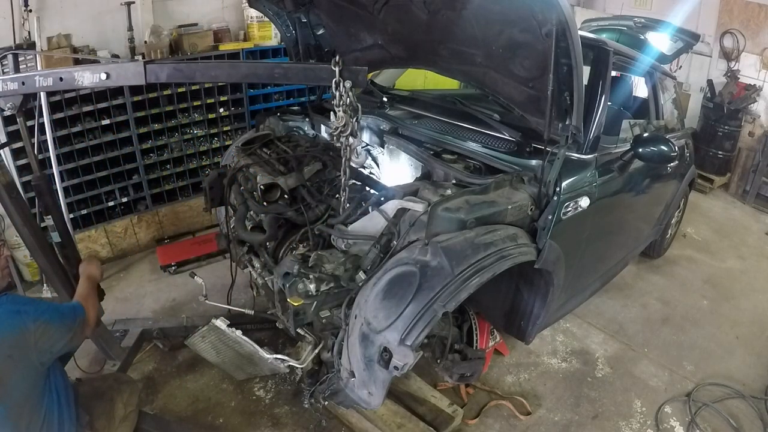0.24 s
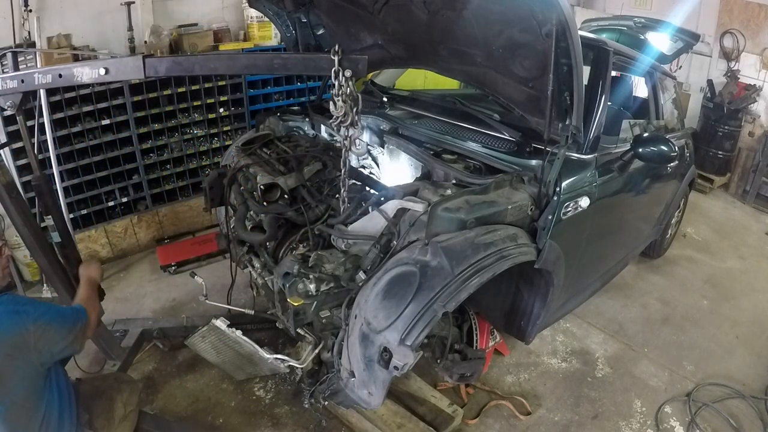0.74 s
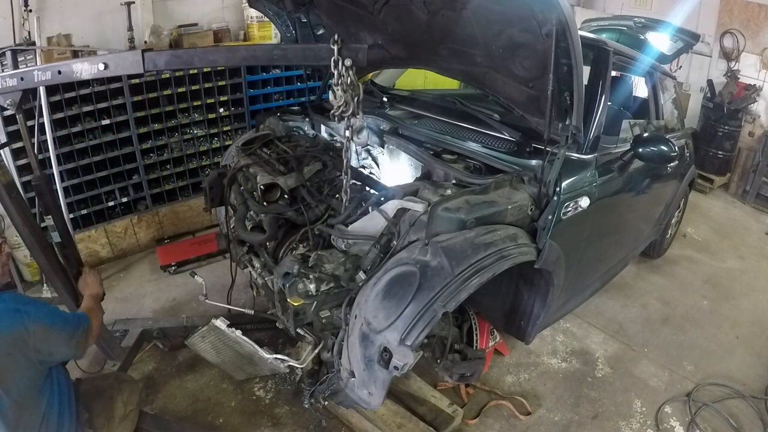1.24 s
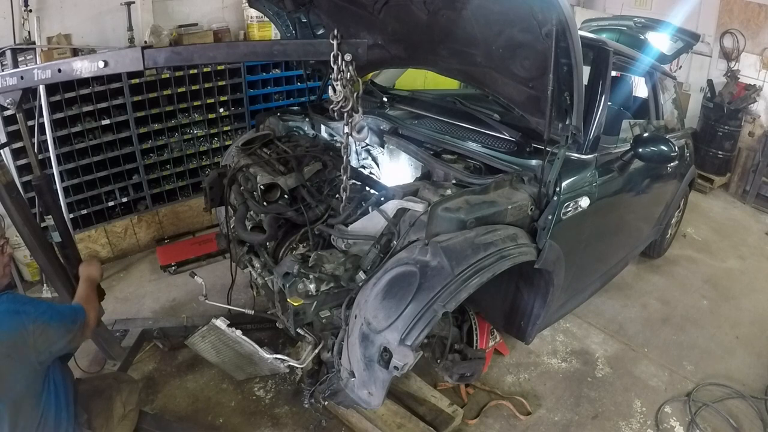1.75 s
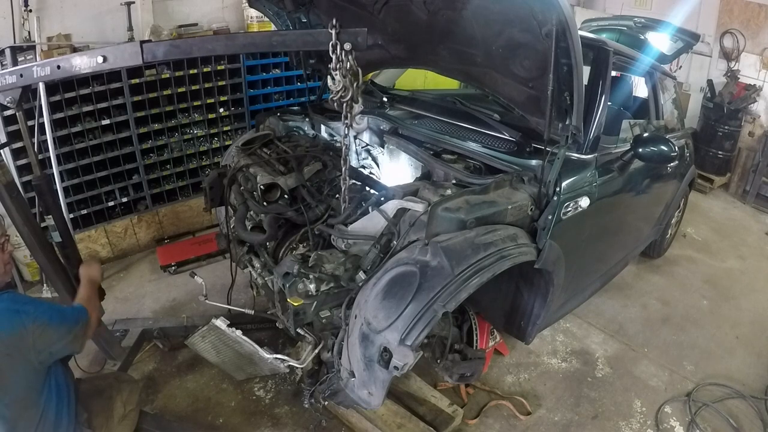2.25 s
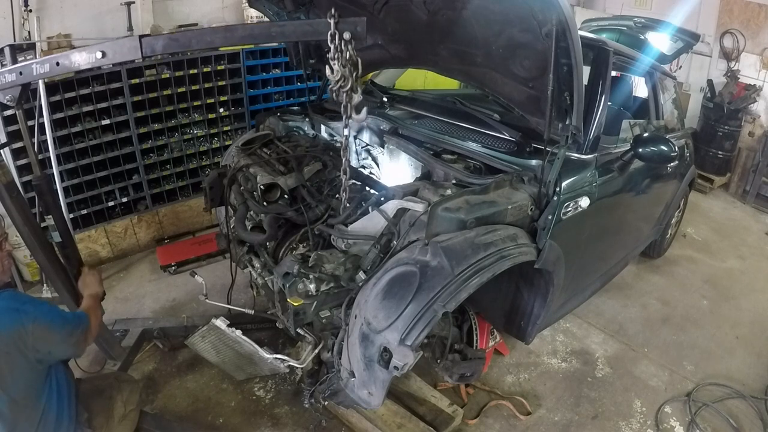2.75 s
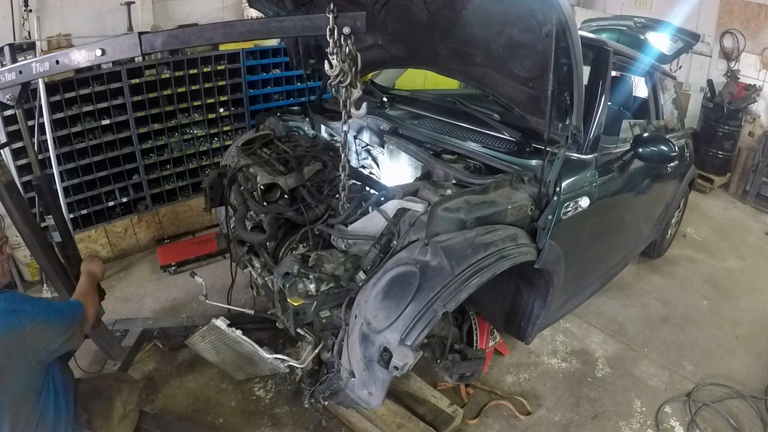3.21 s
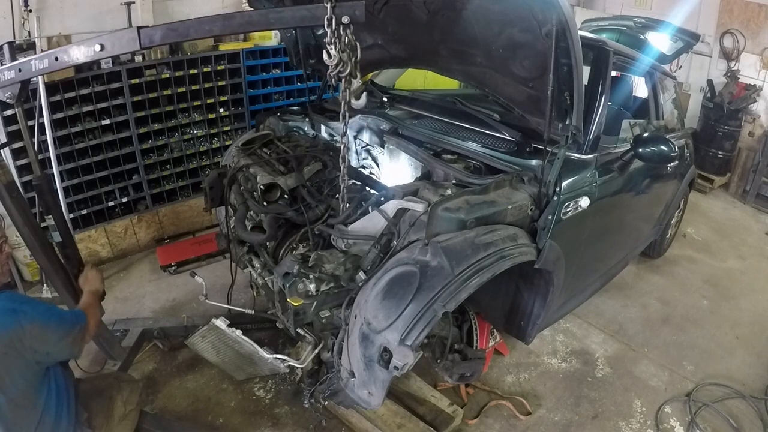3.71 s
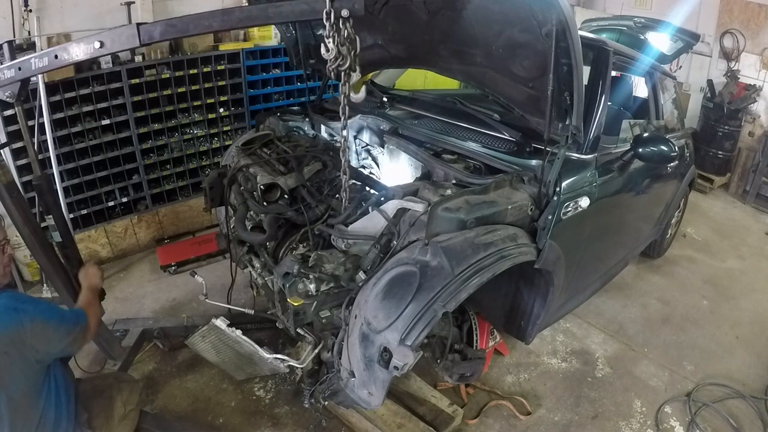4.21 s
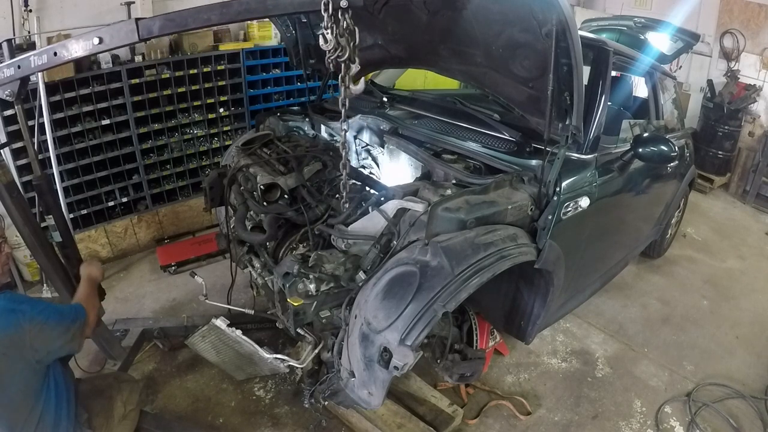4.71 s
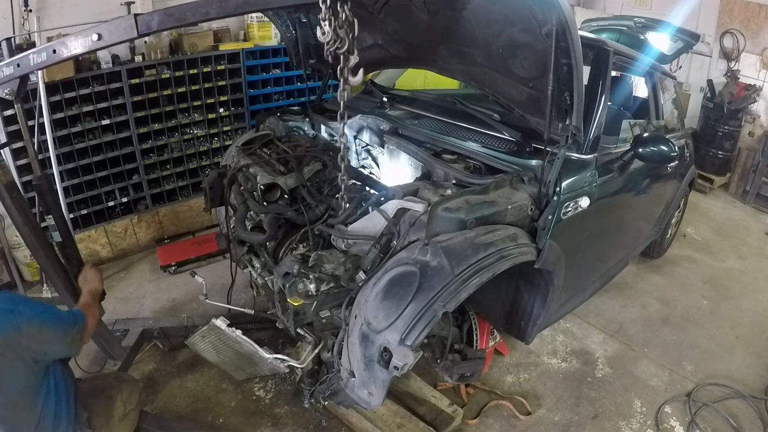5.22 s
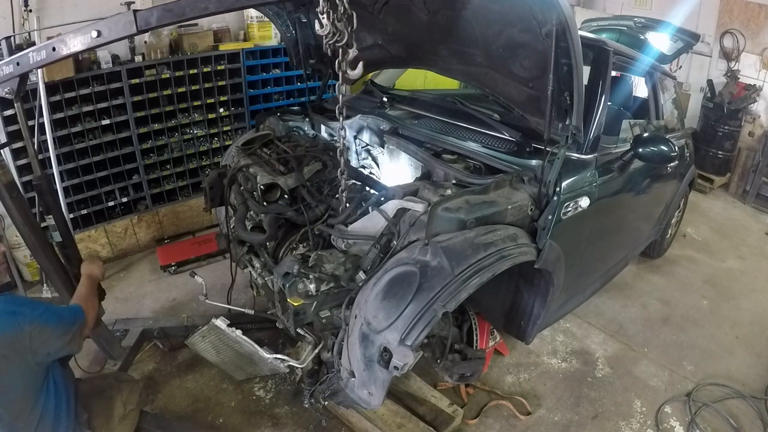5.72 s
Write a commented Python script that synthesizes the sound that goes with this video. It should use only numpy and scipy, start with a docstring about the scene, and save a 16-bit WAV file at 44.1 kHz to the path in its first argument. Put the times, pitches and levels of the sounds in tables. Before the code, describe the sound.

A chain hoist is ratcheted by hand in a repair shop, heard close and slightly left of centre. From about 0.06 s to 5.9 s, some twenty strokes follow one another roughly every 0.3 s. Each begins with two or three hard steel clicks within about 0.03 s, ringing briefly in the middle and upper range, then links rasp over the wheel, swelling and dying within about a tenth of a second. Between strokes comes a thin lever scrape and a short, low frame groan. Early clicks are brighter, with a pinging tip; later ones are duller and more focused as the chain tightens, and frame groans grow more noticeable after about 2.3 s. Extra single link knocks stand out, notably around 0.4, 2.5 and 2.8 s. The pace loosens slightly after 4.6 s. A short bright echo and very faint steady air surround it; the ratcheting continues to the end.

```python
"""Steel clicks, rasps, scrapes and groans repeat about three times a second in a repair shop:
a hand works the lever of a chain hoist to and fro. Each pull drops the pawl over the ratchet
teeth, then the links rasp over the wheel; on each return the lever scrapes and the frame groans.
Taps and irregular knocks set off fading steel tones and bursts of filtered noise for the links.
The shop answers with a short echo and a faint steady hush."""
import sys
import numpy as np
from scipy import signal
from scipy.fft import rfft, irfft, next_fast_len
from scipy.io import wavfile
from scipy.ndimage import uniform_filter1d

SR = 44100
rng = np.random.default_rng(int(sys.argv[2]) if len(sys.argv) > 2 else 0)


def dump(signal):
    """Clip the signal to [-1, 1] and save it as 16-bit WAV at the path in sys.argv[1]."""
    limited = np.clip(np.atleast_2d(signal).T, -1, 1)
    pcm = np.round(limited * 32767).astype(np.int16)
    wavfile.write(sys.argv[1], SR, pcm)


N = 262836  # length in samples

# One row per pull of the lever; all levels are relative.
# Columns: pawl drops t/s, gap to the next tooth/s, three tooth clicks level/dB (3 columns),
# centre of the clicks' colour f/Hz, delay of the drag's crest/s,
# drag in housing, lever and boom level/dB (3 columns)
PULLS = [(0.0603, 0.016, -10.5, -10.5, -4.5, 3020, 0.052, -30, -65, -61),
         (.358, 0.016, -4.5, 0, -18, 2700, 0.067, -21.5, -60, -31),
         (0.6474, .017, -6.5, -3, -2, 2500, 0.07, -27, -30.5, -38),
         (0.9435, 0.017, -3.5, 1, -24, 2850, 0.074, -24, -31, -39),
         (1.246, 0.017, -3, 0, -3.5, 2080, .063, -25.5, -35, -41),
         (1.54, 0.016, -5.5, -3, -3.5, 2670, 0.069, -24.5, -28.5, -54),
         (1.8474, 0.018, -8.5, -7, -2.5, 2570, 0.061, -27.5, -35.5, -46),
         (2.1369, 0.016, -5.5, 0.5, -16, 2230, 0.075, -18.5, -25.5, -33.5),
         (2.4476, 0.017, -3, -1, -3, 2520, 0.064, -25.5, -35.5, -38),
         (2.7479, .0164, -8.5, -2, -4, 2270, 0.061, -28, -32, -28.5),
         (3.0507, 0.017, -4, 0, -6.5, 1890, 0.06, -27.5, -38, -31.5),
         (3.3444, 0.016, -4.5, 0.5, -6, 2350, 0.059, -23.5, -27.5, -39),
         (3.6571, 0.016, -5, -1.8, -2.5, 2250, 0.055, -28.5, -38, -33.5),
         (3.9631, 0.016, -7.5, -2, -4, 2020, 0.065, -29.5, -30, -31.5),
         (4.2804, 0.017, -6.5, -2, -7, 2180, 0.054, -28, -41, -39.5),
         (4.587, 0.016, -7.5, -11, -1, 2060, 0.053, -30, -41.5, -46.5),
         (4.918, .0171, -5, -4, -5, 2380, 0.066, -30, -35, -39),
         (5.2467, 0.016, -11, -10.5, -4, 2480, 0.06, -29, -40, -40),
         (5.5761, 0.018, -5, -0.5, -8, 2210, 0.061, -27, -40.5, -70),
         (5.8926, .018, -8, -5, -4, 2340, 0.06, -25.5, -31, -49)]

# Tones of the steel parts, before any detuning or extra damping.
# Columns of each: f/Hz, time to fade by 60 dB/s, relative level/dB
HOUSING = [(hz, .1, db) for hz, db in [ (1550, 8.5), (1770, 2.5), (1925, 6.5), (1987, -0.5), (2047, 11.0),
           (2097, -4.5), (2285, 4), (2350, 8.5), (2475, 0.5), (2590, 2), (2832, 7.0), (2892, 9),
           (3140, 8.0), (3266, 0), (3445, -16), (3520, 9), (3636, -15), (3770, 5.5), (3950, 2.0)]]
FRAME = [(424.3, 0.19, -8.5), (356.6, 0.076, 1.5), (500, 0.092, -8), (588.3, 0.062, -2), (662.4, 0.05, 6),
         (752, 0.043, 10), (776, 0.092, 1), (851.6, 0.06, 1.5), (1072, 0.021, 9)]
LEVER = [(1185, .08, -6), (1305, .13, 0)]
THUD = [(119, 0.056, 1), (175.6, 0.12, 1.5), (265, 0.14, -8)]


def gain_of(db):
    """Turns decibels into an amplitude factor."""
    return 10 ** (np.asarray(db) / 20)


def unit(x):
    """Scales to energy 1."""
    return x / np.sqrt(np.sum(x ** 2) + 1e-20)


def read(points, hz):
    """Reads a table between its points, along a log-frequency axis."""
    f, value = np.transpose(points)
    return np.interp(np.log(hz + 1), np.log(f + 1), value)


def coloured(x, points):
    """Weights the spectrum of x by a table of levels in dB."""
    length = x.shape[-1]
    size = next_fast_len(length, True)
    weight = gain_of(read(points, np.fft.rfftfreq(size, 1 / SR)))
    return irfft(rfft(x, size) * weight, size)[..., :length]


def add(mix, s, sound):
    """Mixes a stereo sound in at a time in seconds, cutting what falls outside."""
    at = round(s * SR)
    sound = sound[:, max(-at, 0):]
    part = mix[:, max(at, 0):][:, :sound.shape[1]]
    part += sound[:, :part.shape[1]]


def excite(drive, answer):
    """Plays the answer at every knock of the drive, keeping the drive's energy."""
    played = signal.fftconvolve(drive[None], answer, axes=1)
    return unit(played) * np.sqrt(2 * np.sum(drive ** 2))


def ring(modes, spread_db, damping=1.):
    """The answer of steel to one tap; every tap lands elsewhere and weights the modes anew."""
    hz, t60, db = np.transpose(modes + modes)  # each mode is a close pair that beats
    size, apart, detune, start = rng.standard_normal((4, len(hz)))
    hz = hz * (1 + .003 * detune)
    t60 = t60 / damping
    t = np.arange(round(t60.max() * SR * 2 / 3)) / SR
    weight = gain_of(db + spread_db * size) * np.exp(10j * start)
    swing = np.exp(np.outer(2j * np.pi * hz - np.log(1000) / t60, t).astype(np.complex64))
    # a mode reaches the two microphones out of step
    sides = np.exp(.3j * np.outer([1, -1], apart))
    tones = (weight * sides @ swing).imag
    fade_out = np.cos(np.pi / 2 * t / t[-1])
    # the onset takes about one cycle of the lowest mode
    fade_in = np.sin(np.pi / 2 * np.minimum(t * hz.min() / 1.05, 1)) ** 2
    return unit(tones * fade_out * fade_in)


def jingle(t60, above_hz):
    """The answer of the loose links: too many modes to tell apart; a light touch stirs only high ones."""
    # Colour of the countless short link rings; columns: f/Hz, relative level per Hz/dB
    link_colour = [(600, -43), (1100, 3), (3000, 2.5), (3300, 5.5), (4200, -8.5), (5200, -8.5),
                   (6900, -15.5), (7600, -23), (12500, -23), (15400, -44)]
    t = np.arange(3072) / SR
    shared, own = rng.standard_normal((2, len(t)))
    # the treble differs more between the microphones
    own = 0.054 * own + 0.48 * np.diff(own, prepend=0)
    noise = coloured(np.array([shared + own, shared - own]), link_colour)
    rings = signal.lfilter(*signal.butter(3, above_hz, "high", fs=SR), noise)
    return unit(rings * gain_of(-60 * t / t60))


def grit(size, per_s, spread_db):
    """Small irregular knocks of rms 1, at random moments and of random strength."""
    strength = gain_of(spread_db * np.minimum(rng.exponential(1, size), 4))
    happens = rng.random(size) < per_s / SR
    knocks = strength * rng.standard_normal(size) * happens
    return unit(knocks) * np.sqrt(size)


def from_slack_to_taut(slack, taut):
    """One value per pull, changing evenly as the chain tightens from the first pull to the last."""
    return np.linspace(slack, taut, len(PULLS))


def air():
    """A faint steady hush: coloured noise, partly shared by both microphones."""
    # Colour of the shop air; columns: f/Hz, relative level per Hz/dB
    air_colour = [(20, 4.5), (130, -13), (240, -12.5), (790, -7.5), (3600, -20), (9000, -30), (15400, -40)]
    level_db = -54.5  # rms over both channels
    shared, left, right = rng.standard_normal((3, N))
    hush = coloured(np.array([shared + 1.7 * left, shared + 0.91 * right]), air_colour)
    return gain_of(level_db) * hush / hush.std()


def shop(x):
    """Sparse reflections of random sign, different at each microphone, fading at a rate set by pitch."""
    # Echo of the shop; columns: f/Hz, time to fade by 60 dB/s
    echo_fade = [(200, 0.028), (4000, 0.22), (10000, 0.097)]
    taps = np.zeros((2, SR // 2))
    # one reflection at a random place in every 20 samples
    slots = np.arange(100, SR // 2 - 20, 20)
    at = slots + rng.integers(0, 20, (2, (SR // 2 - 101) // 20))
    np.put_along_axis(taps, at, rng.choice([-1., 1.], at.shape), 1)
    hz, t, z = signal.stft(taps, SR, nperseg=256)
    fade = gain_of(-60 * t / read(echo_fade, hz)[:, None])
    tail = signal.istft(z * fade, SR, nperseg=256)[1]
    tail = tail / np.linalg.norm(tail[0])
    return signal.fftconvolve(x[None], tail, axes=1)[:, :N]


def returns():
    """A thin scrape starts first; the frame groans as the load shifts a moment later."""
    # The lever swings back. Columns: t/s, groan delay/s (its bell peaks 0.014 s sooner),
    # scrape, squeak, upper frame and lower frame relative level/dB (4 columns)
    swings_back = [(-.03, 0.02, -28, -30, -18.5, -20.5), (0.2623, 0.033, -30, -44, -30.5, -27.5),
                   (0.5554, 0.041, -29, -32, -32, -28), (0.8543, 0.04, -32, -43, -39.5, -23),
                   (1.154, 0.035, -33.5, -43, -31, -21), (1.4524, 0.031, -33, -33.5, -26, -25),
                   (1.7589, 0.04, -43, -55, -33.5, -22.5), (2.0624, 0.038, -36, -42, -32, -20.5),
                   (2.3721, 0.014, -39.5, -38, -25.5, -16.5), (2.664, .033, -36.5, -46, -26.5, -36.5),
                   (2.967, 0.02, -47, -40, -25.5, -37), (3.275, 0.014, -38.5, -35.5, -20.5, -23.5),
                   (3.5828, 0.016, -40, -36, -19, -17.5), (3.877, 0.043, -39, -40, -20, -33.5),
                   (4.183, 0.045, -34.5, -34.5, -22, -21), (4.4954, 0.04, -40.5, -37, -19.5, -30),
                   (4.837, 0.021, -48, -54, -19, -25), (5.149, 0.058, -34.5, -46, -20.5, -34),
                   (5.4855, 0.047, -36, -49, -17.5, -27), (5.805, 0.051, -42.5, -42.5, -21, -26.5)]
    # Tones of the scrape; columns: f/Hz, time to fade by 60 dB/s, relative level/dB
    guide = [(3200, .03, -9), (3520, .05, 0), (3720, .05, -1)]
    out = np.zeros((2, N))
    t = np.arange(-.02, .11, 1 / SR)
    for s, delay, scrape_db, squeak_db, upper_db, lower_db in swings_back:
        # each drive: a soft switch-on times a bell-shaped swell
        scrape_on = 1 / (1 + np.exp(-t / 0.0036))
        scrape_swell = gain_of(-6 * ((t - .022) / 0.023) ** 2)
        scrape = grit(len(t), 8000, 0.7) * scrape_on * scrape_swell
        groan_on = 1 / (1 + np.exp((.012 - t) / 0.0079))
        groan_swell = gain_of(-6 * ((t - delay + 0.014) / 0.03) ** 2)
        groan = grit(len(t), 3000, 4.1) * groan_on * groan_swell
        # the thud grows faster than the groan: 1.56 dB per dB
        thud_db = -40.5 + 1.56 * (upper_db + 21.5)
        steel = [
            (scrape, scrape_db, ring(guide, 3.4)),
            (scrape, scrape_db - 2.5, jingle(0.0025, 3260)),
            (groan, squeak_db, ring(HOUSING[3:6], 3.9)),
            (groan, upper_db, ring(FRAME[1:] + LEVER[:1], 2.35, damping=1.52)),
            (groan, lower_db, ring(FRAME[:1], 0)),
            (groan, thud_db, ring(THUD, 4.3)),
        ]
        for drive, part_db, answer in steel:
            add(out, s + t[0], gain_of(part_db) * excite(drive, answer))
    return out


def pulls():
    """The drag swells as the chain takes up speed and dies away as it slows."""
    # Tones of the boom; columns: f/Hz, time to fade by 60 dB/s, relative level/dB
    boom = [(1663, 0.58, -3), (1620, 0.49, -8), (1540, 0.56, -15), (1480, 0.19, -14), (1722, 0.52, 0)]
    rattle_db = from_slack_to_taut(-25, -27.5)
    frame_db = from_slack_to_taut(-28, -25.5)
    fall_db_per_s = from_slack_to_taut(278, 412)
    out = np.zeros((2, N))
    t = np.arange(-.06, .2, 1 / SR)  # 0 is the crest of the drag
    tightening = zip(PULLS, rattle_db, frame_db, fall_db_per_s)
    for (s, *_, crest, db, lever_db, boom_db), links_db, body_db, fall in tightening:
        rise_db = -8 * (t / 0.11) ** 2
        fall_db = -fall * (np.sqrt(t ** 2 + 0.011 ** 2) - .02)
        speed_db = np.where(t < 0, rise_db, fall_db)
        drag = gain_of(speed_db) * grit(len(t), 4000, 3.84) * signal.windows.tukey(len(t), .05)
        # the smallest links need speed and rattle in clumps of 64 samples
        clumps = abs(grit(len(t) // 64 + 1, SR, 1.1).repeat(64)[:len(t)])
        rattle = drag * gain_of(0.34 * speed_db) * clumps
        # the weight reaches the frame late in the pull
        load = drag * gain_of(-6 * (np.minimum(t, 0) / 0.041) ** 2)
        steel = [
            (drag, db, ring(HOUSING, 0.94)),
            (load, db, jingle(0.036, 1190)),
            (rattle, links_db, jingle(0.1, 3370)),
            (load, body_db, ring(FRAME, 2.9)),
            (load, lever_db, ring(LEVER, 3.5)),
            (drag, boom_db, ring(boom, 1.5)),
            (load, db - 29.5, ring(THUD, 0.92)),
        ]
        for drive, part_db, answer in steel:
            add(out, s + crest + t[0], gain_of(part_db) * excite(drive, answer))
    return out


def clicks():
    """Each blow rings housing, pawl, links and faintly the frame; crack and ping sound twice, a bounce apart."""
    # Single links knock home on the wheel; columns: t/s, relative blow level/dB
    link_knocks = [(.411, -13), (.4196, -4.5), (.4269, -17), (.682, -5.5), (.7178, -8), (1.0007, -5),
                   (1.0264, -12.5), (1.2557, -14), (1.284, -12), (1.548, -13.5), (1.5797, -15),
                   (1.6084, -9.5), (1.6167, -12), (1.9029, -5.5), (2.2078, -8), (2.508, -3), (2.8118, -1.5),
                   (3.1102, -10), (3.3829, -12), (3.4073, -6.5), (3.973, -13), (4.9816, -10)]
    # Tones of the pawl and of its tip; columns: f/Hz, time to fade by 60 dB/s, relative level/dB
    pawl = [(5160, 0.091, 0), (6620, 0.13, -1.5)]
    pawl_tip = [(7050, .03, 0)]
    # Treble of the three tooth clicks against their blows: level/dB
    tooth_treble_db = [-16, -14.5, -31]
    knock_treble_db = -9.5
    tooth_places = [0, 1, 1.63]  # in gaps after the pawl drops
    # loss of the modes an octave from the centre of a click's colour
    focus_db = from_slack_to_taut(-9, -15)
    # the pawl's tip pings less as the chain tightens
    tip_db = from_slack_to_taut(9, -15.5)

    out = np.zeros((2, N))
    drops = np.transpose(PULLS)[0]
    # each pull favours its own modes at random; neighbouring modes are favoured alike
    seat_db = 6 * uniform_filter1d(rng.standard_normal((len(PULLS), len(HOUSING))), size=3)
    blows = [(s, db, knock_treble_db) for s, db in link_knocks]
    for s, gap, *rest in PULLS:
        for place, db, treble_db in zip(tooth_places, rest, tooth_treble_db):
            blows.append((s + place * gap, db, treble_db))

    for s, db, treble_db in blows:
        pull = abs(drops - s).argmin()
        centre_hz = PULLS[pull][5]
        # within one pull the wheel sits alike, so its clicks favour the same neighbouring modes
        housing = []
        for (hz, t60, own_db), seat in zip(HOUSING, seat_db[pull]):
            off_centre_db = focus_db[pull] * np.log2(hz / centre_hz) ** 2
            housing.append((hz, t60, own_db + seat + off_centre_db))
        bounce = np.zeros(200)
        bounce_s = rng.uniform(.0014, .0024)
        bounce[[0, round(bounce_s * SR)]] = .7, .7 * rng.choice([-1, 1])
        crack = ring(housing, 2, damping=10)
        add(out, s, gain_of(db + 10.5) * excite(bounce, crack))
        add(out, s, gain_of(db + 14.5) * ring(housing, 0.57, damping=0.68))
        add(out, s, gain_of(db + treble_db + 12.5) * jingle(0.052, 5750))
        add(out, s, gain_of(db + treble_db + 9.0) * ring(pawl, 7.2))
        add(out, s, gain_of(db + treble_db + tip_db[pull]) * excite(bounce, ring(pawl_tip, 0)))
        add(out, s, gain_of(db - 3.5) * ring(FRAME[2:] + LEVER, 0.41))
    return out


def scene():
    """The hoist and its echo stand a little to the left, over the hush of the shop."""
    hoist = clicks() + pulls() + returns()
    echo = gain_of(-13.0) * shop(hoist.mean(0))
    left_right = gain_of([[.8], [-2.2]])
    return left_right * (hoist + echo) + air()


def record(dry):
    """The loudest blows bend the amplifier into soft clipping; then the band limit."""
    edge_hz = 15600
    bent = 1.1 * np.tanh(dry / 1.1)
    low_pass = signal.firwin(511, edge_hz, window=("kaiser", 9), fs=SR)
    return signal.oaconvolve(bent, low_pass[None], "same")


dry = scene()
out = record(dry)
dump(out)
```